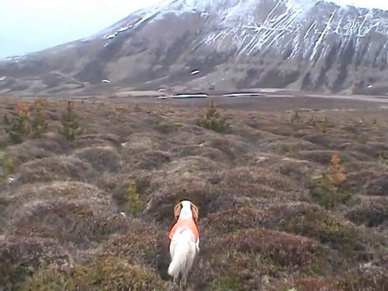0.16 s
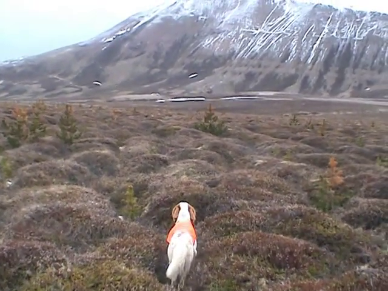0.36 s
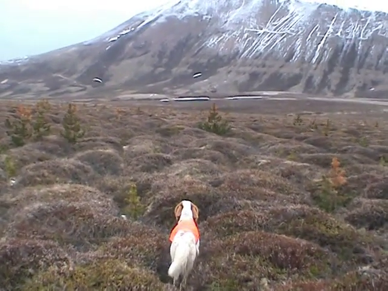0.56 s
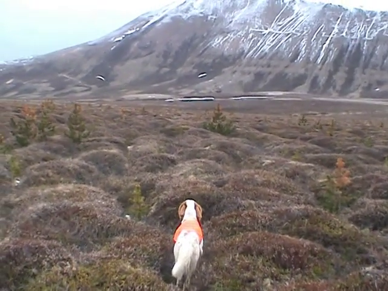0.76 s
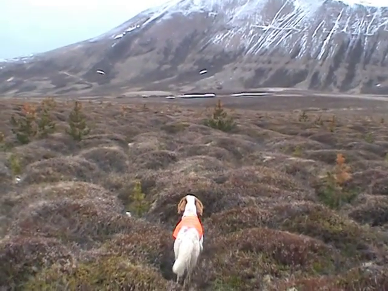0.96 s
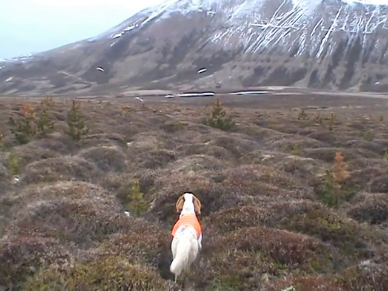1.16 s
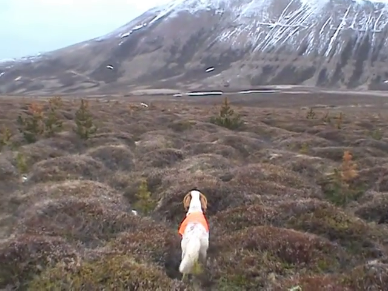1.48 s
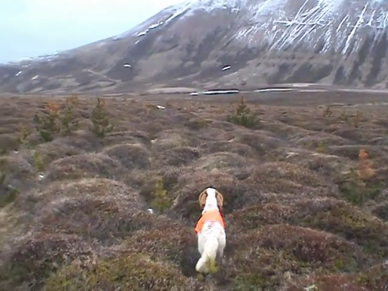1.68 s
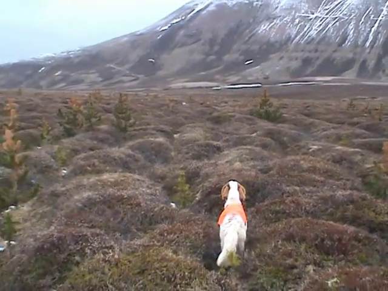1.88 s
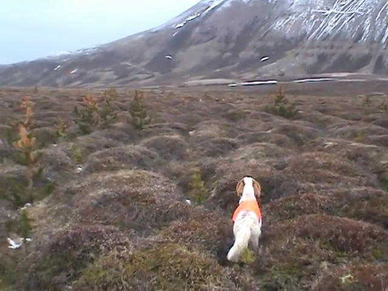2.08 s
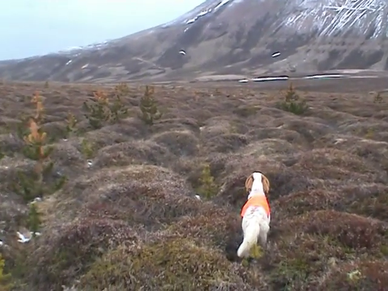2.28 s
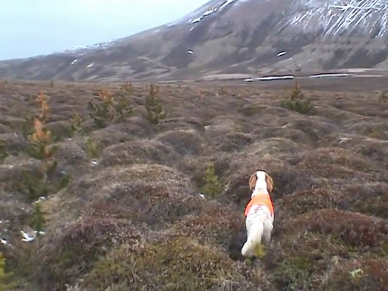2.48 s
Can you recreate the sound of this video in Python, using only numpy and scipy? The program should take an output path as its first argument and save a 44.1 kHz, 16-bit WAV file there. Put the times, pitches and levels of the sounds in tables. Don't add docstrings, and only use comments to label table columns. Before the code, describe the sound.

Wind buffeting an unshielded microphone on open heath, low thuds over faint whir, far bird clicking.

```python
import sys
import numpy as np
from scipy import signal
from scipy.fft import rfft, irfft, next_fast_len
from scipy.io import wavfile
from scipy.ndimage import uniform_filter1d

SR = 44100
rng = np.random.default_rng(int(sys.argv[2]) if len(sys.argv) > 2 else 0)


def boost_factor(decibels):
    exponent = np.asarray(decibels, float) / 20
    return 10 ** exponent


def log_audio(samples):
    frames = np.atleast_2d(samples).T
    limited = np.clip(frames, -1, 1)
    pcm = np.round(limited * 32767).astype(np.int16)
    wavfile.write(sys.argv[1], SR, pcm)


N = 115983


def read(table, col, hz):
    rows = np.array(table, float)
    return np.interp(np.log(np.maximum(hz, 1)), np.log(rows[:, 0]), rows[:, col])


def unit(x):
    return x / np.sqrt(np.mean(x ** 2))


def walk(rate):
    hold = int(SR / rate)
    x = np.repeat(rng.standard_normal(N // hold + 1), hold)
    x = uniform_filter1d(uniform_filter1d(x, hold), hold)[:N]
    return (x - x.mean()) / x.std()


def control(table, col):
    rows = np.array(table, float)
    return np.interp(np.arange(N) / SR, rows[:, 0], rows[:, col])


def pan(db):
    return boost_factor(np.array([[db], [-db]]) / 2)


# time in seconds, stream level in dB, brightness in dB per octave.
GUST = [(0, -43, -2), (.14, -40.5, -0.5), (.33, -42.5, -2), (.5, -52, -2), (.7, -52, 0), (.96, -44.5, -2),
        (1.0, -38, -1.5), (1.24, -30.5, 1.5), (1.36, -33, -0.2), (1.45, -35.5, 0.4), (1.8, -36, 0.5),
        (1.92, -37.5, 0), (2.05, -38, -1), (2.13, -38.5, 0), (2.18, -37.5, -1.5), (2.26, -33.5, .3),
        (2.38, -37.5, -0.5), (2.52, -34.5, -1)]
# centre in seconds, lift in dB, length in seconds.
PUFFS = [(.028, -7, .012), (.18, 1, .03), (.411, 7, .006), (.49, 6, .015), (.54, 3, .012), (.62, 4, .02),
         (.993, 7, .005), (1.13, 1.5, .025), (1.28, 1, .03), (2.463, 3, .005), (2.5, -4, .005),
         (1.205, -3, .006), (1.34, 2, .006), (1.6, 2, .01), (1.91, 3, .02), (2.085, 4, .006),
         (2.0, 2, .012), (2.131, 7, .009), (2.25, 3, .015)]


def gust_level():
    t = np.arange(N) / SR
    lull_s, lull_db_per_s = 2.502, -86
    level = control(GUST, 1) + lull_db_per_s * np.maximum(t - lull_s, 0)
    for at, db, wide in PUFFS:
        level = level + db * np.exp(-((t - at) / wide) ** 2 / 2)
    return level


# frequency in Hz, density in dB per Hz.
STREAM = [(25, -14.5), (90, 2), (250, 0.5), (500, -3), (950, -8.5), (1550, -20.5), (2200, -24.5),
          (9000, -50)]
# frequency in Hz, left-right in dB, likeness from 0 to 1, left's lead in radians.
PAIR = [(45, 0, .85, .8), (120, -6, .3, -2.2), (260, -5, .8, -1.5), (470, -5, .65, -.85), (700, -5, .62, 0),
        (1400, -3, .42, .5), (2200, -1, .42, .3), (5500, -4, .5, .1), (12000, -1, .5, 0)]


def stream():
    size = next_fast_len(N)
    hz = np.arange(size // 2 + 1) * SR / size
    colour = boost_factor(read(STREAM, 1, hz)) * (hz > 18) / (1 + (hz / 9620) ** 10)
    right, own = rfft(rng.standard_normal((2, size))) * colour
    like = np.clip(read(PAIR, 2, hz), 0, .99)
    left = like * np.exp(1j * read(PAIR, 3, hz)) * right + np.sqrt(1 - like ** 2) * own
    left = left * boost_factor(read(PAIR, 1, hz))
    pair = np.array([left, right])
    middle = (left + right) / 2 * (hz > 500) * (hz < 2000)
    norm = np.sqrt(np.mean(irfft(middle, size) ** 2))

    level, bright = gust_level(), control(GUST, 2)
    swell, shared = walk(8.84), [walk(21.0) for _ in range(6)]
    stream_db, calm_db = 1.5, -40.5
    out = 0
    for k in range(20):
        centre = 22 * 2 ** (k / 2)
        off = np.clip(2 * np.log2(np.maximum(hz, 1) / centre), -1, 1)
        blend = np.pi / 2 * (k % 4) / 4
        near = np.cos(blend) * shared[k // 4] + np.sin(blend) * shared[k // 4 + 1]
        share = 0.66 if centre < 140 else 1
        db = calm_db + share * (level - calm_db)
        db = db + bright * np.clip(np.log2(centre / 1000), -2, 2.5)
        db = db + 0.68 * swell + 0.1 * near + 0.77 * walk(31)
        band = irfft(pair * np.cos(np.pi / 2 * off) ** 2, size)[:, :N]
        out = out + band * boost_factor(db + stream_db)
    return out / norm


# frequency in Hz, density in dB per Hz.
WHIR = [(1470, -41), (2500, -35), (3580, -6), (4300, -9), (5830, 0.5), (7000, -3), (7160, -7), (9940, -12),
        (15500, -27.5)]
# frequency in Hz, rms level in dB.
TONES = [(5634, -79), (5743, -78), (6849, -75), (7772, -84), (9560, -86), (11100, -88)]


def drum():
    t, hz = np.arange(N) / SR, np.arange(N // 2 + 1) * SR / N
    drum_hz, head_hz = 50, 300
    turn = np.tile(rng.standard_normal((2, SR // drum_hz)), N * drum_hz // SR + 1)[:, :N]
    head = np.tile(rng.standard_normal((2, SR // drum_hz // 6)), N * drum_hz * 6 // SR + 1)[:, :N]
    raw = rng.standard_normal((2, N)) + boost_factor(walk(9.1)) * turn + boost_factor(-8) * head
    tick = np.exp(2.5 * (np.cos(2 * np.pi * head_hz * t) - 1))
    raw = raw * (1 + 0.93 * tick)
    raw = raw + 0.18 * raw[::-1]
    colour = boost_factor(read(WHIR, 1, hz)) * np.minimum(hz / 2500, 1) ** 2
    out = unit(irfft(rfft(raw) * colour, N)) * boost_factor(-61.5)
    for tone_hz, db in TONES:
        level = np.sqrt(2) * boost_factor(db + 2.0 * walk(6.0))
        cycles = tone_hz * t + 0.054 * walk(8.0)
        out = out + level * np.sin(2 * np.pi * cycles)
    return out * pan(-7.5)


def heath():
    hz = np.arange(1, N // 2 + 2) * SR / N
    centre_hz, octaves = 2320, 1
    colour = np.exp(-(np.log2(hz / centre_hz) / octaves) ** 2 / 2)
    hiss = unit(irfft(rfft(rng.standard_normal((2, N))) * colour, N))
    return hiss * boost_factor(-64.5 + 0.58 * walk(8.7)) * pan(7)


def add_eddy(out, at_s, db, hz, pan_db, turn, lead_rad=-2.5, cycles=0.42):
    wide = cycles / hz
    first = max(int((at_s - 3 * wide) * SR), 0)
    i = np.arange(first, min(int((at_s + 3 * wide) * SR), N))
    t = i / SR - at_s
    phase = 2 * np.pi * (hz * t + turn) + np.array([[lead_rad], [0]])
    bell = np.exp(-(t / wide) ** 2 / 2)
    out[:, i] += boost_factor(db) * pan(pan_db) * bell * np.cos(phase)


# time in seconds, buffeting in dB.
BUFFET = [(0, -40), (.17, -37), (.32, -34.5), (.45, -54), (.57, -56), (.62, -35), (.7, -52), (.8, -38),
          (.95, -45), (1.02, -29), (1.2, -43), (1.5, -44), (1.9, -47), (2.1, -25.5), (2.25, -28.5),
          (2.35, -66), (2.5, -30), (2.63, -45)]


def add_small_eddies(out):
    force = control(BUFFET, 1)
    per_s, centre_hz, octaves, scatter_db = 150, 173, 0.36, 5
    chance = rng.random((600, 3))
    spread = rng.standard_normal((600, 2))
    times = np.cumsum(-np.log(1 - chance[:, 0])) / per_s
    for at, (_, size, turn), (pitch, side) in zip(times, chance, spread):
        if at * SR < N:
            db = force[int(at * SR)] - scatter_db * np.log(1 - .95 * size)
            add_eddy(out, at, db, centre_hz * 2 ** (octaves * pitch), -4 + 3 * side, turn)


# time in seconds, peak in dB, pitch in Hz, left-right in dB.
EDDIES = [(0.245, -20, 170, -7), (0.312, -18, 260, -5), (0.412, -16, 150, -4), (0.988, -14, 230, -5),
          (1.021, -15, 160, -10), (1.071, -18, 280, -4), (1.096, -18, 280, -11), (1.182, -17, 260, -2),
          (1.194, -17, 210, -3), (1.285, -19, 260, -6), (1.603, -17, 230, -12), (1.692, -17, 270, -7),
          (1.949, -18, 150, -3), (2.048, -17, 220, -2), (2.086, -12, 280, 1), (2.116, -17, 230, -3),
          (2.131, -10, 260, -3), (2.208, -16, 290, -4), (2.229, -14, 270, -4), (2.244, -13, 260, -3),
          (2.262, -14, 300, 1), (2.418, -12, 270, -3), (2.465, -17, 260, -8), (2.516, -18, 230, -12),
          (2.541, -17, 280, -10)]
# time in seconds, peak in dB, pitch in Hz, left-right in dB.
SOFT_EDDIES = [(0.165, -20.5, 153, -5), (0.229, -26, 90, 1), (.337, -30, 101, -3), (.378, -28, 151, -1),
               (0.526, -23.5, 140, 0), (.547, -33, 130, -6), (.598, -28, 250, -1), (0.044, -33, 161, -3),
               (.19, -23, 120, 0), (0.482, -21, 140, -1), (0.611, -23, 127, -6.5), (0.633, -32, 130, -7),
               (0.806, -24.5, 140, 2), (0.898, -28, 120, -3), (1.11, -20.5, 117, -12), (1.192, -18, 96, -8),
               (1.921, -22, 190, -4), (2.038, -21, 140, -7), (2.08, -23, 110, -11), (2.12, -21.5, 90, -2),
               (2.149, -23, 190, 0), (2.187, -25, 140, -8), (2.42, -14.5, 171, -1.5), (2.47, -23, 130, 1),
               (2.517, -18, 132, -5.5), (2.539, -16, 178, -8)]


def eddies():
    out = np.zeros((2, N))
    add_small_eddies(out)
    for (at, db, hz, pan_db), turn in zip(EDDIES, rng.random(len(EDDIES))):
        db = db - abs(pan_db) / 4
        add_eddy(out, at, db, hz, pan_db, turn, cycles=.62)
        add_eddy(out, at, db - 16, hz * 2.6, pan_db - 4, turn, lead_rad=-1.2)
    for (at, db, hz, pan_db), turn in zip(SOFT_EDDIES, rng.random(len(SOFT_EDDIES))):
        add_eddy(out, at, db, hz, pan_db, turn, lead_rad=-2.27)
    add_eddy(out, .273, -8, 260, 0, rng.random(), lead_rad=-2.85, cycles=.5)
    return out


# start in seconds, peak in dB.
RATTLE = [
    (.0215, -39),
    (.061, -40),
    (2.4603, -37),
    (2.4828, -36),
    (2.5048, -31.5),
    (2.527, -32),
    (2.5497, -34),
    (2.5738, -35),
    (2.6, -33.5),
    (2.628, -33),
]
# frequency in Hz, level in dB, 60 dB decay in seconds.
THROAT = [(1200, -1, .009), (1650, -7, .005), (2100, 0, .013), (2550, -8, .005), (2950, -4, .011)]


def bird():
    size = 4000
    out, t = np.zeros(N + size), np.arange(size) / SR
    onset = 1 - np.exp(-t / .0004)
    drifts = rng.standard_normal((len(RATTLE), len(THROAT)))
    for (at, db), drift in zip(RATTLE, drifts):
        ring = 0
        for k, ((hz, gain_db, t60), d) in enumerate(zip(THROAT, drift)):
            decay = np.exp(-np.log(1000) * t / t60)
            wave = np.sin(2 * np.pi * hz * (1 + 0.01 * d) * t)
            ring = ring + (-1) ** k * boost_factor(gain_db + 1.1 * d) * decay * wave
        i = int(at * SR)
        out[i:i + size] += ring * onset * boost_factor(db + 3)
    return out[:N] * pan(3.5)


def scene():
    return stream() + drum() + heath() + eddies() + bird()


def low_pass(x):
    return signal.sosfilt(signal.butter(12, 15720, fs=SR, output="sos"), x)


def record(dry):
    top_hz = 15720
    held = np.concatenate([dry, dry[:, ::-1]], axis=1)
    hz = np.arange(N + 1) * SR / (2 * N)
    mix = irfft(rfft(held) * (hz < top_hz), 2 * N)[:, :N]
    return low_pass(mix)


dry = scene()
out = record(dry)
log_audio(out)
```